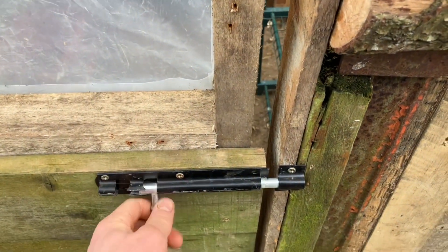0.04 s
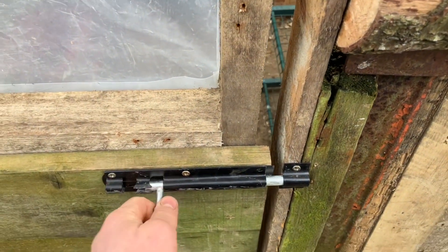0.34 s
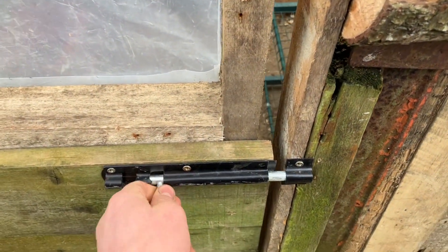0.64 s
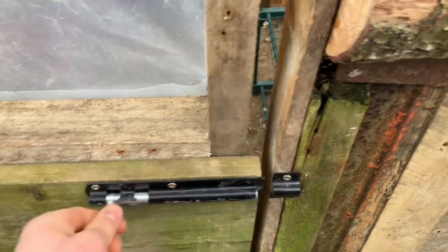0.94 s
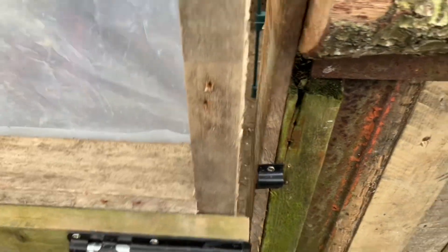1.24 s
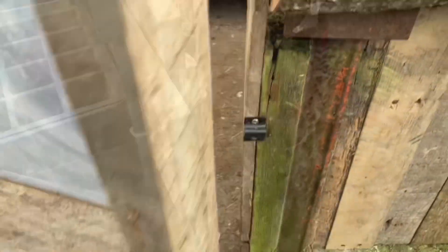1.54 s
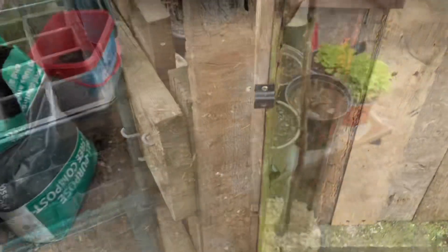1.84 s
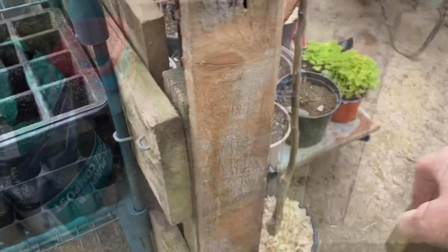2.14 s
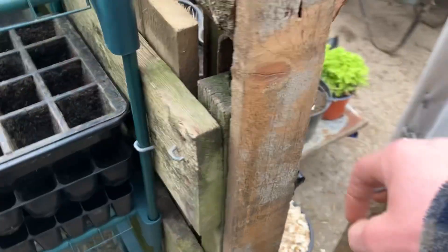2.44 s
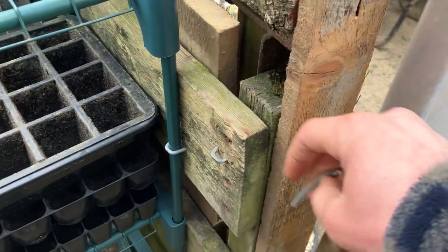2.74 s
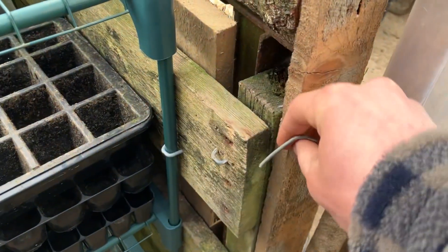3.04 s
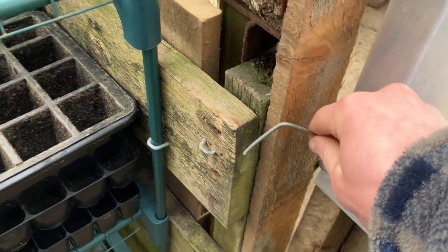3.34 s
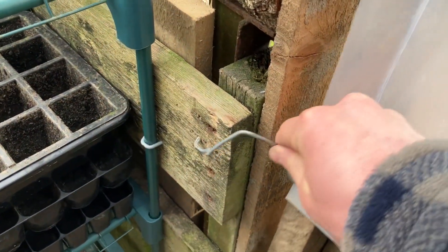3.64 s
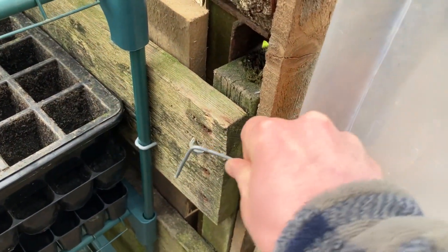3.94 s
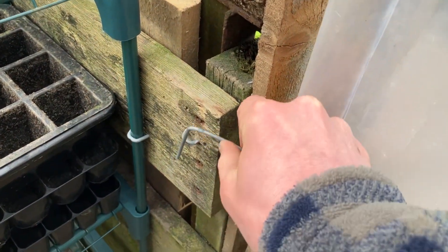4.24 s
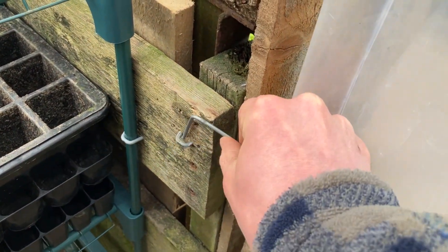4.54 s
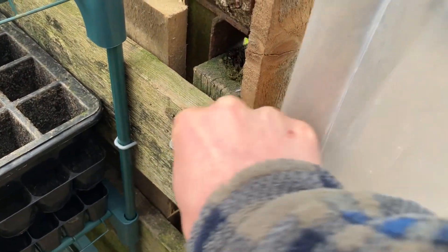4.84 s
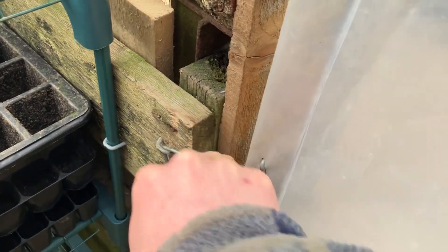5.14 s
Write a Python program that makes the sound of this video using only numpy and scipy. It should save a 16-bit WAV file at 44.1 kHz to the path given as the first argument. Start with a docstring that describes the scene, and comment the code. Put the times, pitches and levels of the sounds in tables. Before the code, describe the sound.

A metal bolt slides back with a ringing clack, a wooden door squeaks open, and a wire hook scrapes and clicks into its eye.

```python
"""A steel bolt on a wooden greenhouse door grinds round in its barrel and is shot back with a ringing clack.
The door knocks against its frame and swings open with a squeak; the outdoor rumble deepens, a far engine
joins it, and there is a dull thud. Then a hand and a sleeve rustle close by as a wire hook is lifted.
A distant crow caws twice, and last the hook scrapes and drops into its eye.
Knocks are bursts of noise plus fading tones; rubbing is noise made of many tiny slips."""
import sys
import numpy as np
from scipy import signal
from scipy.fft import rfft, irfft, next_fast_len
from scipy.io import wavfile
from scipy.ndimage import uniform_filter1d

SR = 44100
rng = np.random.default_rng(int(sys.argv[2]) if len(sys.argv) > 2 else 0)


def digitize_waveform(pressure):
    """Quantize a signal to 16-bit integers and store it at the path in sys.argv[1].

    Rows of a 2-D input are taken as channels; values are limited to [-1, 1].
    """
    field = np.atleast_2d(pressure).T
    bounded = np.clip(field, -1, 1)
    quanta = np.round(bounded * 32767).astype(np.int16)
    wavfile.write(sys.argv[1], SR, quanta)


N = 229257
TIME = np.arange(N) / SR
EVENT_SAMPLES = 24000  # room for one blow or one rub

# Blows. Thump (bass) and tick (treble) are added to the level; the factor scales how long a blow rings.
# t/s, level/dB, thump/dB, tick/dB, length factor
KNOB_BLOWS = [(0.7165, -18, -23.5, -13, 0.34)]  # the bolt's knob flicking up against its plate
BOLT_BLOWS = [(0.591, -41.5, -23, -7.5, 0.45), (0.8315, -31, -14.5, 4, 0.4), (0.868, -14, -24, 1.5, 0.85),
              (0.8718, -5.5, -20.5, -6, 0.65), (0.8792, -11.5, -18, -1.5, 0.57),
              (0.8828, -7.5, -12, -8.5, 0.81)]
KNOCKS_AND_THUD = [(0.4875, -35, -17.5, -35, 0.96), (0.7205, -26.5, -20, -20, 1.1),
                   (0.832, -29, -11.5, -20, 0.9), (0.98, -39.5, -24, -28.5, 0.35),
                   (1.093, -35.5, -20, -18, 0.62), (1.139, -38.5, -12, -9.5, 0.61),
                   (1.449, -37, -33, -36, 0.88), (1.457, -73, -20.5, -30, 0.4), (1.499, -65, -7, -1, .4),
                   (1.84, -55, -7.5, -24, 0.9), (2.245, -62.5, 13, 18, 0.91), (2.283, -51.5, 16, 4.5, 0.73)]  # door knocks, then a dull low thud like a footstep
HOOK_BLOWS = [(3.1105, -34, 6, -4, 0.068), (3.187, -49, 7.5, -14, 0.84), (4.0045, -42, -7, 10, 0.12),
              (4.6515, -29.5, -36, 1.5, 0.41), (4.745, -33.5, 5, -6, 0.32), (4.786, -45, -2.5, -9.5, 1.3),
              (4.864, -45.5, -13, -8, 1.6), (4.8955, -27.5, -3.5, -11, 0.97), (5.068, -58.5, 4, -8, 0.7),
              (5.126, -51.5, -1, -34, 0.8), (5.169, -51, -5, -31, 1.03)]
# The tones each struck part rings with; decay is the time to fade by 60 dB. f/Hz, level/dB, decay/s
KNOB_TONES = [(2770, 2, 0.027), (2970, 13.5, 0.018), (3500, -9, .025)]
BOLT_TONES = [(54.7, -10, 4.8), (93.4, -12.5, 2.3), (192, -5, 0.33), (342, 6.5, 0.24), (373, 3, 0.2),
              (563.5, -2.5, 0.16), (636, -4, .1), (722, -1.5, 0.19), (895, -3.5, 0.12), (1084, 0, 0.12),
              (1370, -6.5, 0.028), (1534, -1.5, 0.1), (1690, -6, 0.08), (2240, 2.5, 0.085),
              (2360, 4.5, .085), (2680, 0, .06), (2890, 2, 0.059), (3250, 1, 0.11), (3780, -1, 0.023),
              (4200, -8, 0.023), (4505, -3.5, 0.064), (4629, 5.5, 0.059), (7700, -2, 0.027),
              (10800, 2, 0.062)]
DOOR_TONES = [(140, 3.5, 0.17), (206, 0, 0.092), (254, 10.5, 0.026), (402, 11, 0.043), (491.4, 5, 0.064),
              (727, -32, .07), (978, 8.5, 0.0255), (1167, -5, 0.018)]
HOOK_TONES = [(180, 2, 0.36), (283, -4, 0.2), (487.7, 6, 0.2), (921, -14, 0.034), (1330, -37, 0.043),
              (2050, -12, 0.027), (3040, 7, 0.034), (4230, -22, 0.036), (4334, -15, 0.085),
              (8570, -17, 0.023)]
# The dense, noisy ringing of wood and steel: f/Hz, decay/s
RING_DECAY = [(100, 0.58), (300, 0.11), (900, 0.099), (2500, 0.09), (6000, 0.082), (14000, 0.015)]

# Rubs. Body (bass) and hiss (treble) are added to the level; swell is the change from start to end.
# t/s, length/s, level/dB, body/dB, hiss/dB, swell/dB
BOLT_RUBS = [ (0.025, 0.21, -63, -10.5, -3, 0.5), (0.335, 0.032, -100, -21, 22, -11),
             (0.462, 0.077, -74.5, -5, 7.5, -3), (0.608, 0.17, -68.5, -9, -2.5, -7),
             (0.803, 0.021, -62.5, -1.5, -3.5, 11.5), (0.831, 0.039, -42, -11, -4.5, 12)]  # the bolt in its barrel
DOOR_RUBS = [ (1.105, .06, -70.5, -9, 3, 7), (1.385, 0.13, -67, 1.5, -1, 3.5)]  # the door brushing its frame
HAND_RUBS = [ (2.03, 0.14, -72, 2.5, -0.5, 9.5), (2.46, 0.089, -63.5, 0, -2, 2.5),
             (2.616, 0.081, -59, 1, 2, 1.5), (2.715, 0.14, -64, 2, -1.5, 7.5),
             (2.89, 0.051, -67.5, 0.5, 2, -9)]  # the hand reaching for the hook
SLEEVE_RUBS = [ (3.19, 0.11, -73, 4, 7, -2), (3.31, .11, -73.5, 1, 6, -2), (3.535, 0.14, -71, -4, 4.5, 3.5),
               (3.69, 0.1, -73, -10, 8.5, -4), (3.81, 0.18, -65.5, -13, 4.5, 2),
               (4.005, 0.078, -68, -10.5, 5, -7), (4.245, 0.12, -69.5, -18, 1, -4),
               (4.92, 0.11, -85.5, 20.5, 13.5, -9), (5.08, 0.14, -76.5, 16, 2, 5)]  # sweeps of the sleeve
WIRE_RUBS = [ (3.05, 0.07, -54.5, -8, 5, 9), (3.15, 0.078, -60, 5, -5, -2.5), (4.54, .11, -64, -20, 6, 11),
             (4.648, 0.083, -53.5, -5.5, 6, -9), (4.735, 0.091, -60.5, 1.5, -1, 10),
             (4.84, 0.066, -58.5, 6.5, -1, 12)]  # the hook scraping on post and eye
# Where the scraped wire sings: f/Hz, boost/dB
WIRE_PEAKS = [(1950, 7.5), (4400, -0.5), (5480, 7.5), (8300, 4)]

# Colours: how strong each sound is from bass to treble. f/Hz, level/dB
KNOB_SPECTRUM = [(200, -20), (1000, -0.5), (2100, -11.5), (2750, 4.5), (3400, -3.5), (4200, -16),
                 (7500, -12), (16000, -30)]
BOLT_SPECTRUM = [(60, -19.5), (170, -5.5), (400, 2.5), (800, -0.5), (1200, -0.5), (1800, 0), (2600, 4),
                 (3400, -3), (4600, -5.5), (5800, -13.5), (7800, -7), (10800, -11), (13000, -16),
                 (16000, -23)]
BARREL_SPECTRUM = [(100, 0), (800, 4), (1700, 0.5), (3200, 2.5), (4800, -4), (6000, -11), (8000, -5),
                   (11000, -10), (16000, -17)]
DOOR_SPECTRUM = [(60, 0.5), (140, 13), (420, 11), (1000, -3), (1600, -6), (3000, -10), (6000, -39.5),
                 (16000, -35.5)]
HOOK_SPECTRUM = [(60, -6.5), (170, -3), (400, -10.5), (900, 9.5), (1600, 31.5), (3700, 25.5), (5300, -1),
                 (8200, -3), (11000, -8.5), (16000, -34)]
WIRE_SPECTRUM = [(100, 14.5), (400, 8.5), (1000, 11.5), (1900, 12.5), (3200, 16), (4400, 11), (4900, 1.5),
                 (5500, -5), (6400, -2.5), (8200, -5), (12000, -5.5), (16000, -6)]
HAND_SPECTRUM = [(100, 19.5), (400, 16), (900, 8), (1600, 5), (2400, 2), (3000, 3.5), (4000, 1),
                 (5600, -11.5), (8000, -5), (10000, -6), (12500, -2), (16000, -5.5)]
SLEEVE_SPECTRUM = [(100, -12.5), (400, -27), (1000, -9.5), (2400, 6.5), (3300, 12), (4500, 10), (5600, -8),
                   (6400, -4.5), (9000, -6), (12000, -9), (16000, -9)]
AIR_DOOR_SHUT = [(20, -7.5), (55, -0.5), (110, -2), (200, -11.5), (400, -21.5), (900, -31.5), (2200, -31),
                 (4000, -39), (16000, -41.5)]
AIR_DOOR_OPEN = [(20, -14), (55, 8.5), (110, 6), (200, -8), (400, -18), (900, -27), (2200, -21),
                 (4000, -28.5), (16000, -34.5)]

# Hinge squeaks, timed at their middle: t/s, half length/s, f/Hz, glide/(Hz per s), level/dB
HINGE_SQUEAKS = [(1.672, 0.024, 2192, -900, -45.5), (1.65, 0.037, 2244, -1500, -66),
                 (1.975, 0.004, 2170, -2000, -66), (2.045, .005, 2175, -2000, -68),
                 (2.105, 0.005, 2180, -2000, -68), (2.161, 0.012, 1713, -2200, -56)]
# Calls of a far crow: t/s, length/s, f/Hz, level/dB
CROW_CAWS = [(3.399, .5, 325.4, -75), (4.324, 0.31, 361, -72)]
# Tones of a far idling engine: multiple of its cycle rate, level/dB
ENGINE_TONES = [(4, -67), (5, -66.5), (6, -79.5)]
# How sound reaches left and right, facing the bolt and facing the hook:
# f/Hz, left lead/rad, left minus right/dB, likeness of the sides (0 to 1)
STEREO_AT_BOLT = [(0, 0, 0, .99), (400, .4, 1, .95), (1000, 1.2, 3, .85), (2200, 2.6, 5, .6),
                  (3300, 2.3, 4, .85), (4400, 1.5, 0, .6), (5800, .5, -1, .6), (6900, 0, 0, .95),
                  (9150, -3.14, 0, .99), (16000, -13.1, 0, .99)]
STEREO_AT_HOOK = [(0, 0, 0, .99), (300, 0, 0, .97), (1200, -.8, -2, .6), (3100, -3.1, -2, .7),
                  (5000, -6.2, 0, .7), (6500, -9, 0, .75), (7900, -6.3, 0, .93), (9800, -3.14, 0, .98),
                  (16000, 8.6, 0, .98)]


def bolt():
    """The bolt grinds round, its knob flicks up, then it slides back and slams, bouncing, on its stop."""
    knob = blows(KNOB_BLOWS, KNOB_SPECTRUM, KNOB_TONES, crack_db=7.5, crack_s=0.004,
                 ring_db=-5.5, tones_db=-11.5, echo_db=-35, echo_s=0.24)
    clacks = blows(BOLT_BLOWS, BOLT_SPECTRUM, BOLT_TONES, crack_db=6.5, crack_s=0.0045,
                   ring_db=-3.5, tones_db=-21, echo_db=-34, echo_s=0.24)
    grind = rubbing(BOLT_RUBS, BARREL_SPECTRUM, attack_s=0.012, release_s=0.013, grain_db=3)
    return grind + knob + clacks


def door():
    """The wooden door knocks and brushes against its frame; then comes a dull thud, like a footstep."""
    bumps = blows(KNOCKS_AND_THUD, DOOR_SPECTRUM, DOOR_TONES, crack_db=0, crack_s=0.0011,
                  ring_db=-4, tones_db=-7, echo_db=-12.5, echo_s=0.17)
    brush = rubbing(DOOR_RUBS, DOOR_SPECTRUM, attack_s=0.029, release_s=0.02,
                    grain_db=3.43, flutter_db=2)
    return bumps + brush


def hook():
    """The wire hook scrapes, ticks on its eye and drops home."""
    ticks = blows(HOOK_BLOWS, HOOK_SPECTRUM, HOOK_TONES, crack_db=11, crack_s=0.0022,
                  ring_db=-4.5, tones_db=-35, echo_db=-27.5, echo_s=0.42)
    scrape = rubbing(WIRE_RUBS, WIRE_SPECTRUM, attack_s=0.011, release_s=0.017,
                     grain_db=2.9, flutter_db=1.2, peaks=WIRE_PEAKS)
    return ticks + amp(-2.5) * scrape


def hinge(waver=0.0056):
    """The turning hinge gives short, nearly pure squeaks that sag in pitch."""
    out = np.zeros((2, N))
    for middle, half, hz, glide, db in HINGE_SQUEAKS:
        t = np.arange(-3 * half, 3 * half, 1 / SR)
        pitch = hz * (1 + waver * wobble(len(t), 200)) + glide * t
        phase = 2 * np.pi * np.cumsum(pitch) / SR
        tone = np.sin(phase) + amp(-26) * np.sin(2 * phase) + amp(-41.5) * np.sin(3 * phase)
        sides = amp([[db + 2.5], [db]])  # louder on the left
        add(out, middle + t[0], sides * tone * np.exp(-(t / half) ** 2))
    return out


def rustle():
    """Skin and cloth rub as the arm reaches for the hook and moves it."""
    hand = rubbing(HAND_RUBS, HAND_SPECTRUM, attack_s=0.014, release_s=0.029,
                   grain_db=3.4, flutter_db=1.5, arch_db=1.5)
    sleeve = rubbing(SLEEVE_RUBS, SLEEVE_SPECTRUM, attack_s=0.045, release_s=0.024,
                     grain_db=2.6, flutter_db=0.74, arch_db=2.5)
    return hand + sleeve


def blows(rows, colour, own_tones, crack_db, crack_s, ring_db, tones_db, echo_db, echo_s):
    """Each blow is a brief crack, a dense ring, the part's own tones and a faint echo off nearby walls."""
    out = np.zeros((2, N))
    t, hz = np.arange(EVENT_SAMPLES) / SR, np.fft.rfftfreq(EVENT_SAMPLES, 1 / SR)
    centres = np.geomspace(100, 14000, 7)  # seven bands, each fading at its own speed
    bands = np.array([np.interp(np.log(hz + 1), np.log(centres), row) for row in np.eye(len(centres))])
    tone_hz, tone_db, tone_decay = np.transpose(own_tones)
    shapes = split_colour(colour, hz) * resonances(tone_hz, hz)
    ring_s = read_curve(RING_DECAY, centres)[:, None]
    rise = 1 - np.exp(-t / (0.00048 + 1.1 / centres[:, None]))  # bass builds up more slowly than treble
    brightness = np.sqrt(centres / centres[-1])[:, None]  # the crack lies mostly in the treble
    echo = amp(echo_db) * fade(t, echo_s) * (1 - np.exp(-t / 0.019))
    phases = rng.uniform(0, 2 * np.pi, (2, len(own_tones), 1))
    tones = np.sin(2 * np.pi * tone_hz[:, None] * t + phases) * fade(t, tone_decay[:, None])
    tones *= (1 - np.exp(-t * tone_hz[:, None])) * amp(tone_db + tones_db)[:, None]
    for start, db, thump_db, tick_db, length in rows:
        force = amp(db + np.array([thump_db, 0, tick_db]))
        spectrum = rfft(rng.standard_normal((2, EVENT_SAMPLES))) * (force @ shapes)
        length = max(length, 0.1)
        crack = amp(crack_db) * brightness * np.exp(-t / (crack_s * length))
        ring = amp(ring_db) * fade(t, ring_s * length)
        loudness = rise * np.sqrt(crack ** 2 + ring ** 2 + echo ** 2)
        burst = (irfft(spectrum[:, None] * bands) * loudness).sum(1)
        ringing = (force @ low_mid_high(tone_hz)) @ tones * min(length, 1)
        add(out, start, burst + ringing)
    return out


def resonances(tone_hz, hz, lift_db=6.5, width_hz=54):
    """A part answers most strongly near its own tones; higher peaks are wider."""
    widths = width_hz * (0.5 + hz[:, None] / 4000)
    peaks = peak(hz[:, None], tone_hz, widths)
    return amp(lift_db * (peaks.max(1) - 0.5))


def rubbing(rows, colour, attack_s, release_s, grain_db, flutter_db=0, arch_db=0, peaks=()):
    """Sliding surfaces make countless tiny slips: grain makes them uneven, flutter clumps them."""
    out = np.zeros((2, N))
    t, hz = np.arange(EVENT_SAMPLES) / SR, np.fft.rfftfreq(EVENT_SAMPLES, 1 / SR)
    singing = amp(sum(boost_db * peak(hz, peak_hz, width_hz=180) for peak_hz, boost_db in peaks))
    for start, length, db, body_db, hiss_db, swell_db in rows:
        sizes = amp(grain_db * np.minimum(rng.exponential(1, len(t)), 5))
        clumps = amp(flutter_db * wobble(len(t), 300))
        slips = unit(rng.standard_normal((2, len(t))) * sizes * clumps)
        shape = amp(db + np.array([body_db, 0, hiss_db])) @ split_colour(colour, hz)
        patches = amp(2.74 * wobble(len(hz), 160))  # each rub meets another spot with its own colour
        scrape = irfft(rfft(slips) * shape * singing * patches)
        add(out, start, scrape * rub_loudness(t, length, swell_db, attack_s, release_s, arch_db))
    return out


def rub_loudness(t, length, swell_db, attack_s, release_s, arch_db):
    """A rub speeds up, is fastest midway (arch), presses harder or eases (swell) and coasts to a stop."""
    attack = np.sin(np.pi / 2 * np.minimum(t / attack_s, 1)) ** 2
    progress = np.minimum(t / length, 1)
    hold = amp(swell_db * (progress - 0.5) + arch_db * (np.sin(np.pi * progress) - 1))
    return attack * hold * np.exp(-np.maximum(t - length, 0) / release_s)


def crow(rough=0.0667, bend=0.023, throat_hz=1575, width_hz=230):
    """Hoarse far caws: shaky overtones rise and fall in pitch, shaped by one throat resonance."""
    out = np.zeros((2, N))
    for start, length, pitch_hz, db in CROW_CAWS:
        t = np.arange(0, length, 1 / SR)
        arch = np.sin(np.pi * t / length)
        jitter = wobble((2, len(t)), 120)
        hz = pitch_hz * (1 - bend * (1 - arch))
        phase = 2 * np.pi * np.cumsum(hz * (1 + rough * jitter), axis=1) / SR
        voice = sum(np.sin(k * phase) * peak(k * hz, throat_hz, width_hz) for k in range(3, 8))
        add(out, start, amp(db) * unit(voice) * np.sqrt(arch))
    return out


def engine(cycle_hz=22.56, wander=0.01916):
    """A far idling engine hums a few low tones that drift with its speed."""
    phase = 2 * np.pi * np.cumsum(cycle_hz * (1 + wander * wobble(N, 6000))) / SR
    return sum(amp(db) * np.sqrt(2) * np.sin(k * phase + rng.uniform(0, 2 * np.pi))
               for k, db in ENGINE_TONES)


def air(colour, db):
    """Steady outdoor rumble with a thin hiss above it."""
    size = next_fast_len(N)
    shape = amp(read_curve(colour, np.fft.rfftfreq(size, 1 / SR)))
    spectrum = rfft(rng.standard_normal((2, size))) * shape
    return amp(db) * unit(irfft(spectrum, size)[:, :N])


def stereo(pair, table):
    """Blends two unrelated versions of a sound into left and right, each with its own timing and level."""
    size = next_fast_len(N + 2048)
    hz = np.fft.rfftfreq(size, 1 / SR)
    table_hz, *columns = np.transpose(table)
    lead, balance_db, likeness = (np.interp(hz, table_hz, column) for column in columns)
    left, other = rfft(pair, size)
    right = (likeness * left + np.sqrt(1 - likeness ** 2) * other) * np.exp(-1j * lead)
    return irfft(np.array([left * amp(balance_db / 2), right * amp(-balance_db / 2)]), size)[:, :N]


def low_mid_high(hz):
    """How much of each frequency counts as bass, middle and treble."""
    below_middle, below_treble = 1 / (1 + (hz / 620) ** 6), 1 / (1 + (hz / 5400) ** 10)
    return np.array([below_middle, below_treble - below_middle, 1 - below_treble])


def split_colour(colour, hz):
    """Splits a colour into bass, middle and treble of equal power."""
    return np.array([unit(share * amp(read_curve(colour, hz))) for share in low_mid_high(hz)])


def read_curve(points, hz):
    """Reads between the rows of a table, giving every octave the same room."""
    table_hz, values = np.transpose(points)
    return np.interp(np.log(hz + 1), np.log(table_hz), values)


def peak(hz, centre_hz, width_hz):
    """A hump that is 1 at its centre and half that one width away."""
    return 1 / (1 + ((hz - centre_hz) / width_hz) ** 2)


def fade(t, decay_s):
    """Dies away by 60 dB in decay_s."""
    return np.exp(-np.log(1000) * t / decay_s)


def wobble(shape, span):
    """A random wiggle: noise smoothed over span points."""
    return unit(uniform_filter1d(rng.standard_normal(shape), size=span))


def amp(db):
    """Turns decibels into a gain."""
    return 10 ** (np.asarray(db) / 20)


def unit(x):
    """Scales to an average power of 1."""
    return x / np.sqrt(np.mean(x ** 2) + 1e-20)


def add(mix, start_s, sound):
    """Mixes a two-channel sound in at start_s."""
    part = mix[:, max(round(start_s * SR), 0):][:, :sound.shape[1]]
    part += sound[:, :part.shape[1]]


def scene():
    """Bolt and door, then hook and crow; as the door swings, the air changes and the engine fades in."""
    opened = np.clip((TIME - 1.9) / 0.26, 0, 1)
    at_bolt = bolt() + door() + np.sqrt(1 - opened) * air(AIR_DOOR_SHUT, db=-62)
    at_hook = hook() + rustle() + crow() + np.sqrt(opened) * air(AIR_DOOR_OPEN, db=-61.5)
    placed = stereo(at_bolt, STEREO_AT_BOLT) + stereo(at_hook, STEREO_AT_HOOK)
    return placed + hinge() + opened * engine()


def record(dry):
    """Gently squashes the loudest peaks, then cuts the treble above 16 kHz."""
    low_pass = signal.firwin(255, 16000, window=("kaiser", 8), fs=SR)
    return signal.oaconvolve(np.tanh(dry), low_pass[None], "same")


dry = scene()
out = record(dry)
digitize_waveform(out)
```